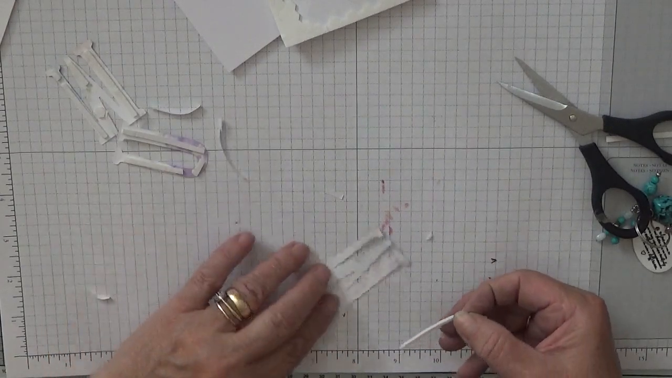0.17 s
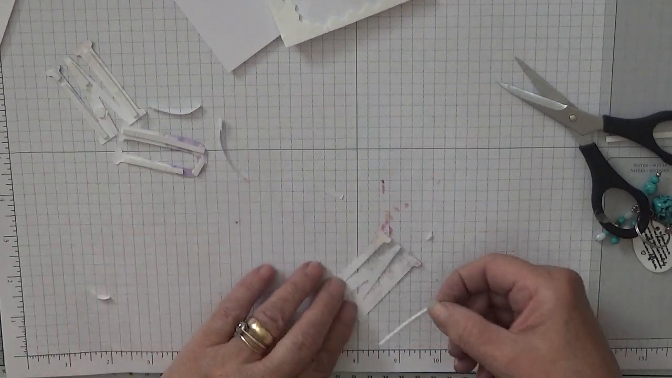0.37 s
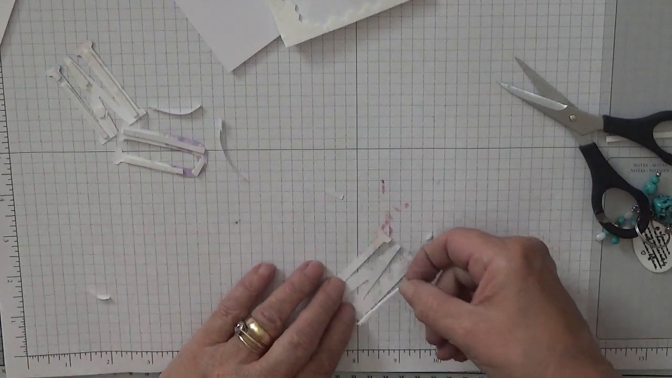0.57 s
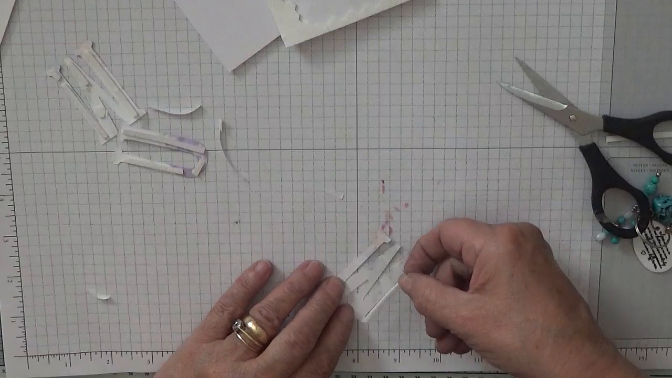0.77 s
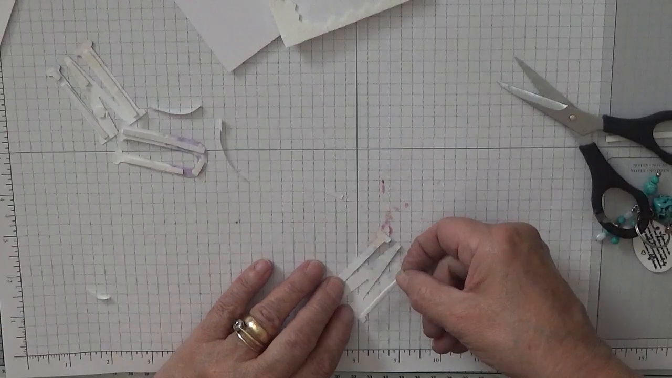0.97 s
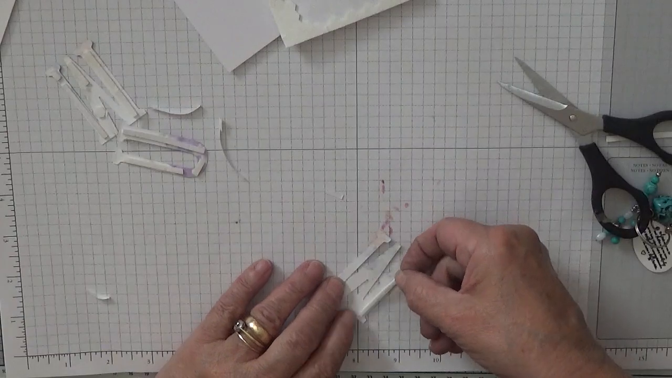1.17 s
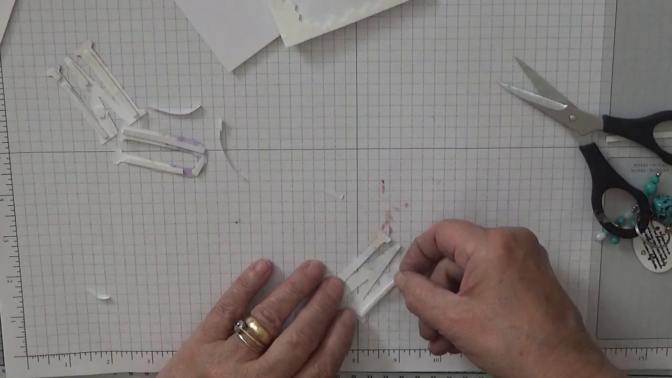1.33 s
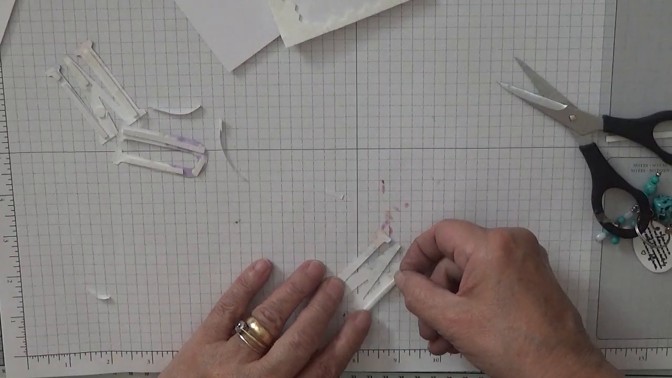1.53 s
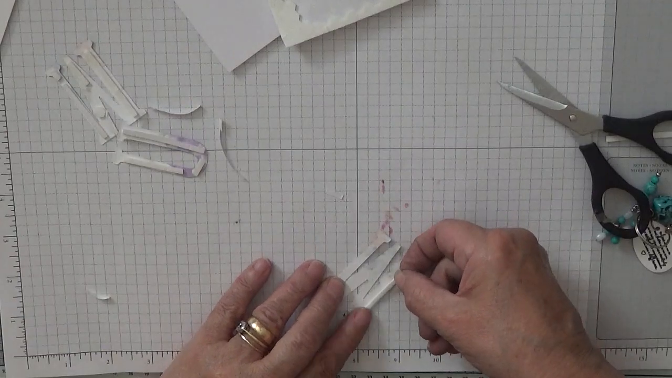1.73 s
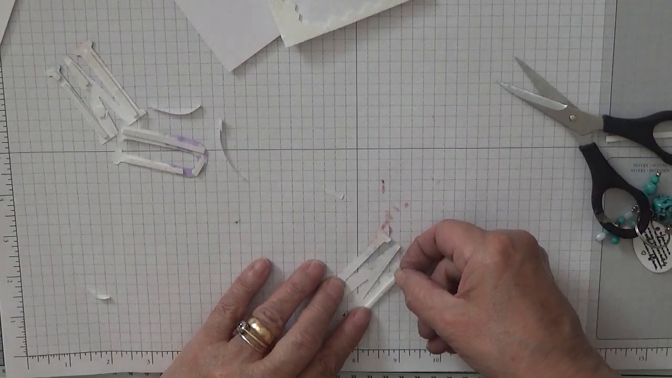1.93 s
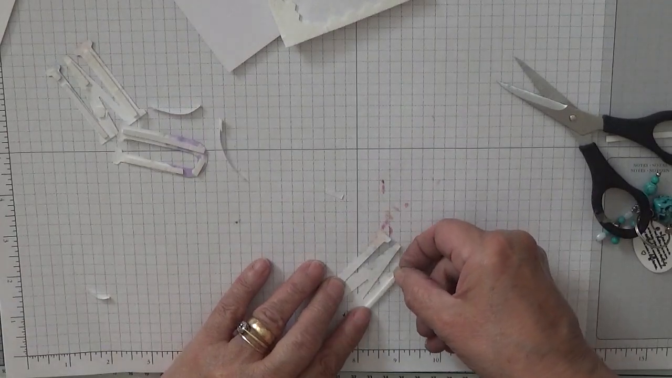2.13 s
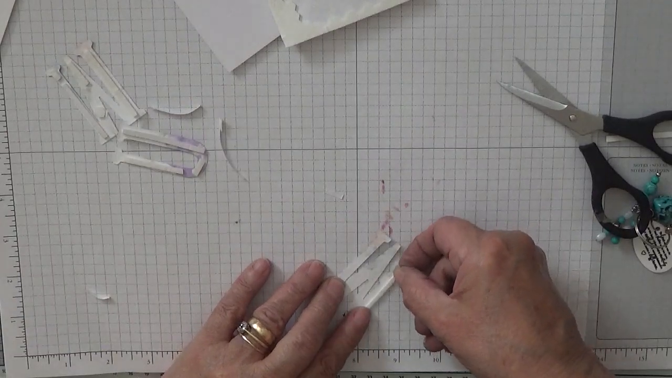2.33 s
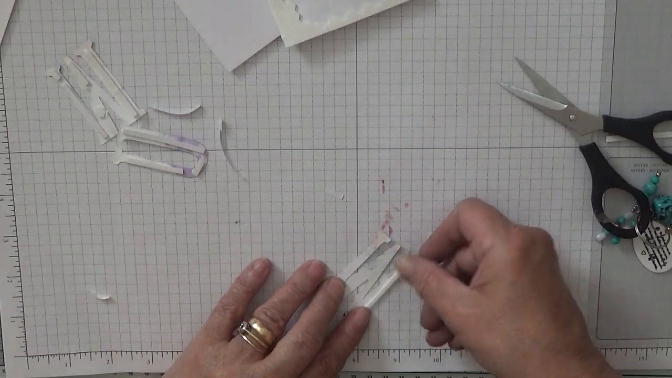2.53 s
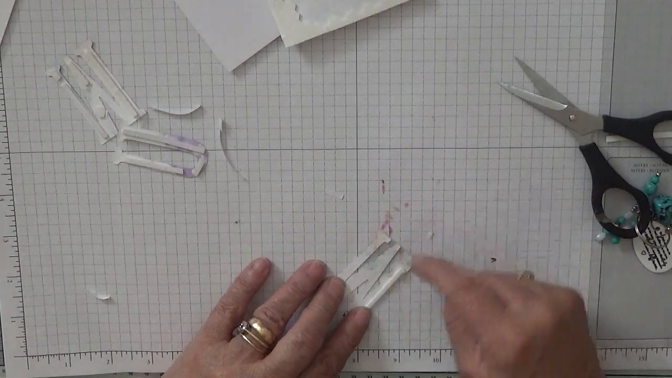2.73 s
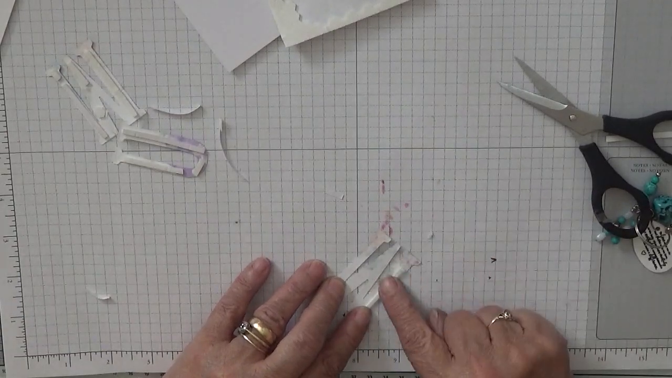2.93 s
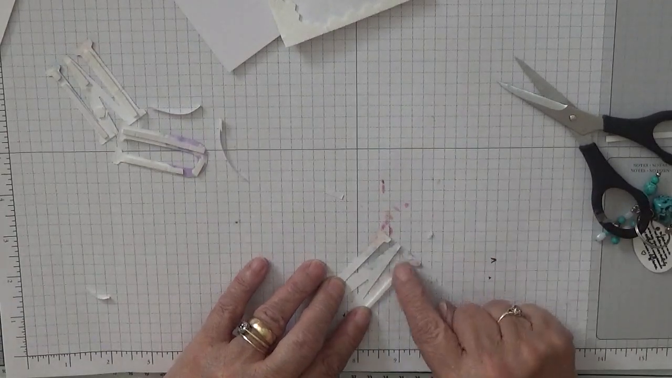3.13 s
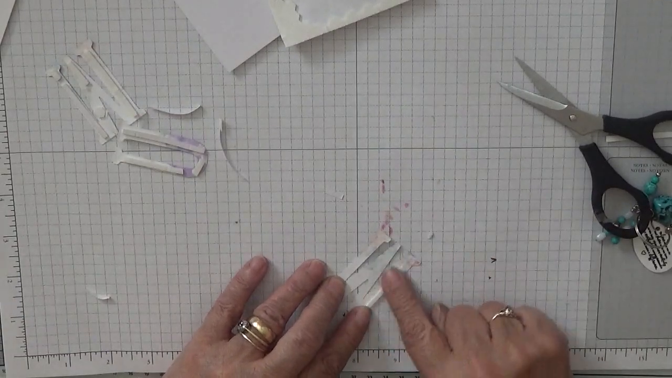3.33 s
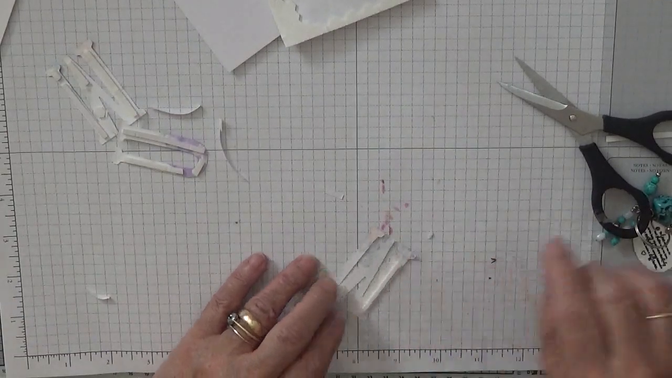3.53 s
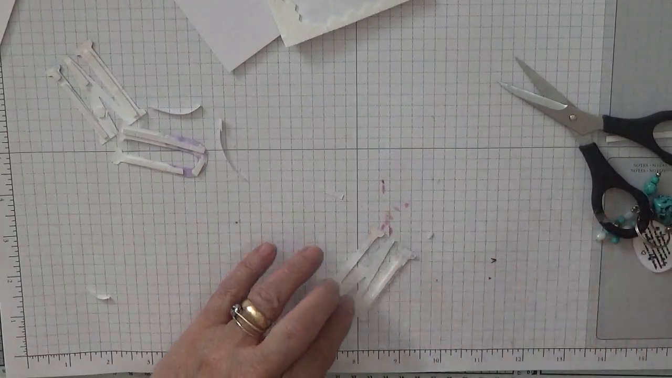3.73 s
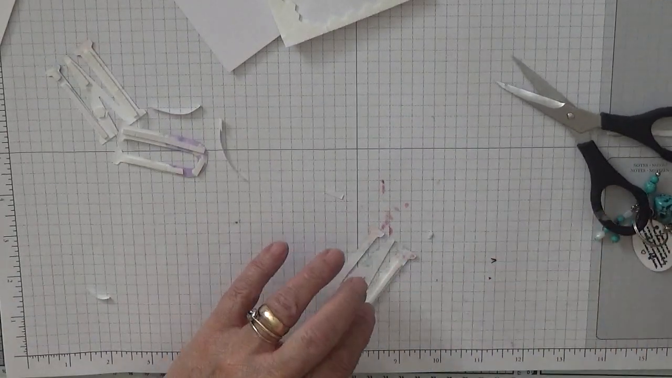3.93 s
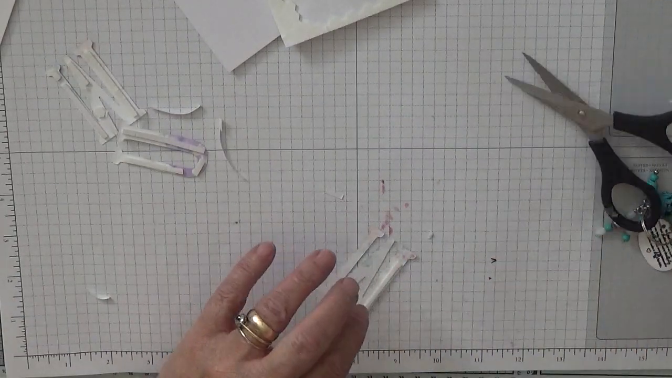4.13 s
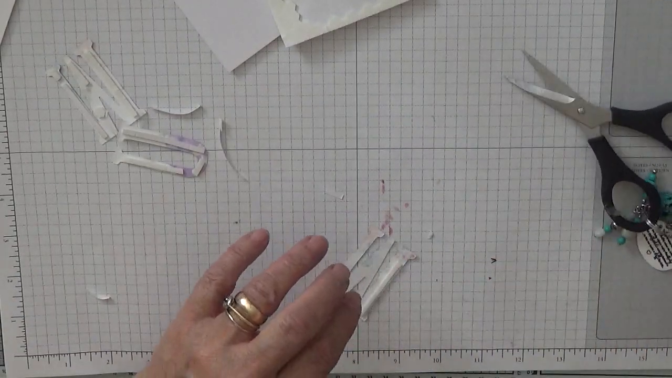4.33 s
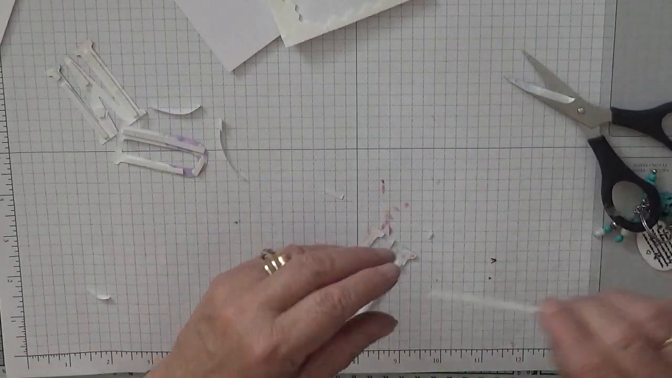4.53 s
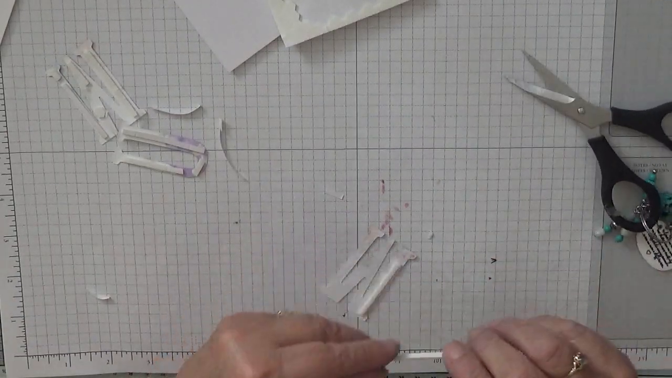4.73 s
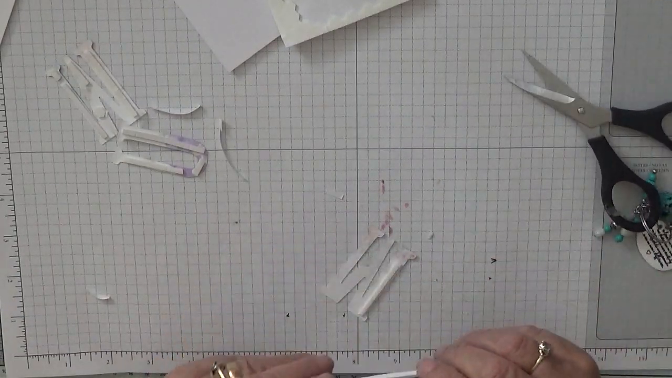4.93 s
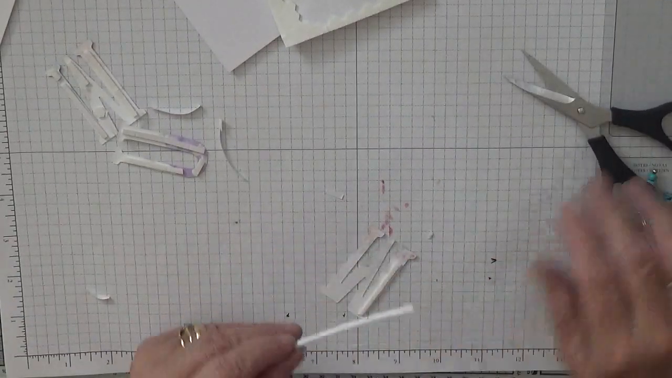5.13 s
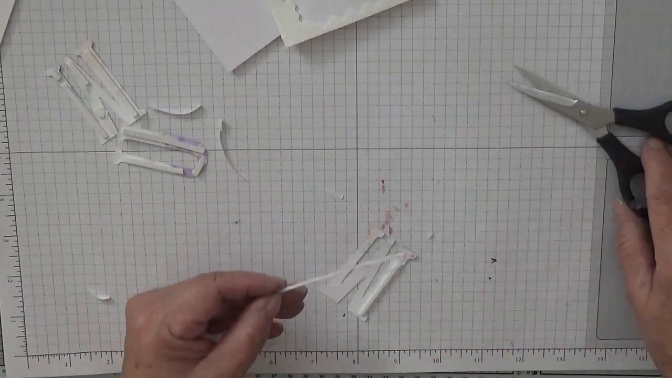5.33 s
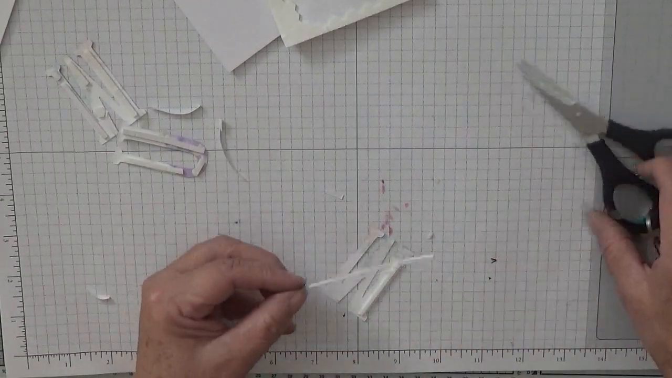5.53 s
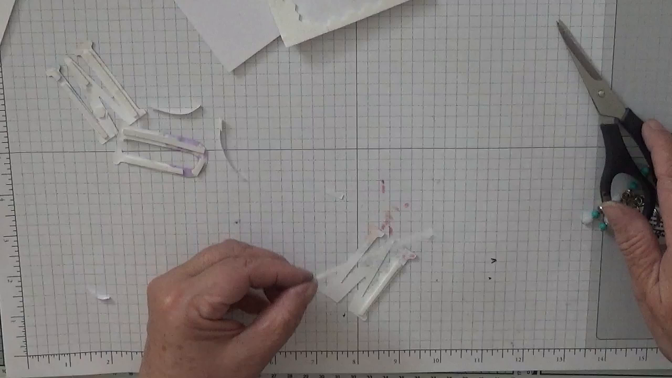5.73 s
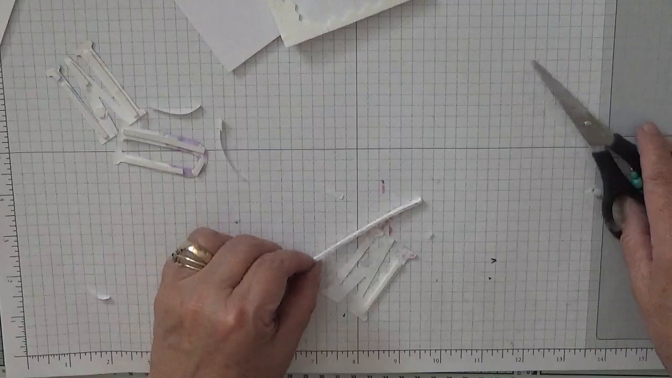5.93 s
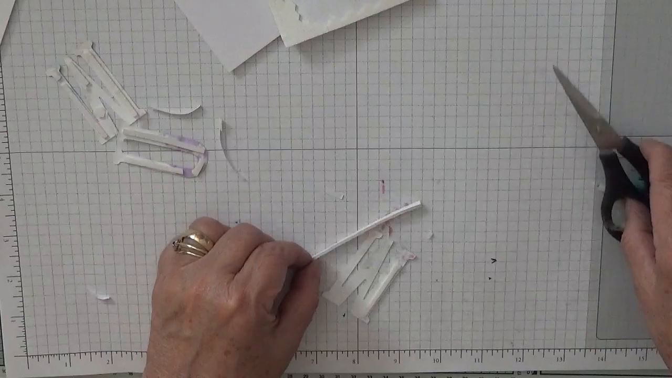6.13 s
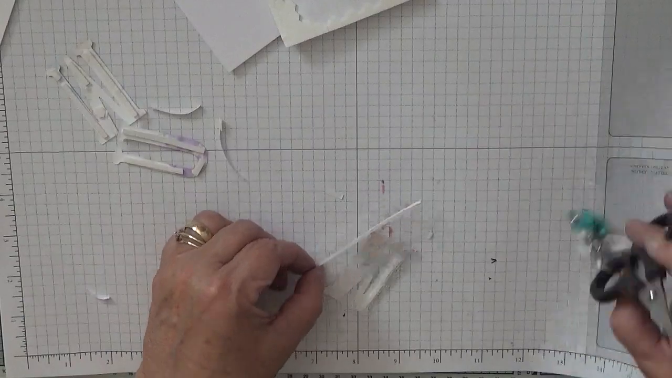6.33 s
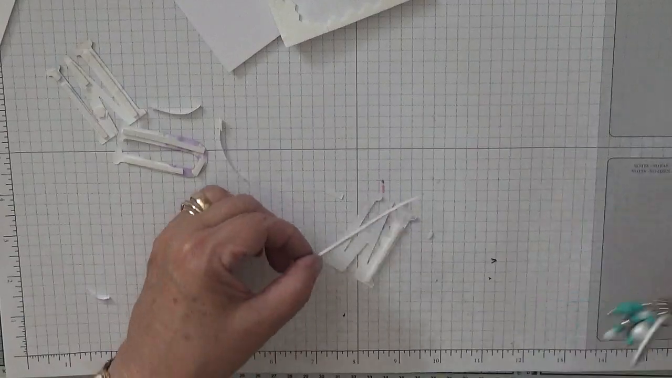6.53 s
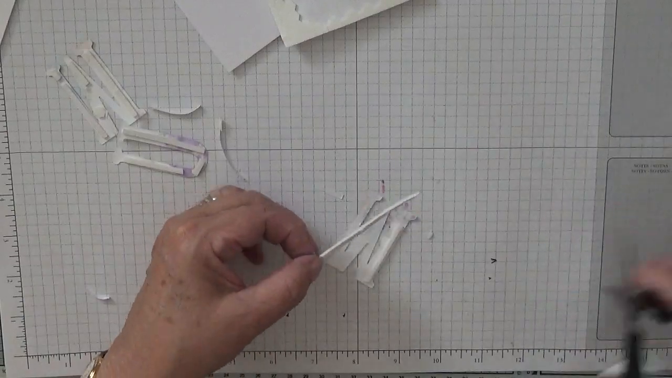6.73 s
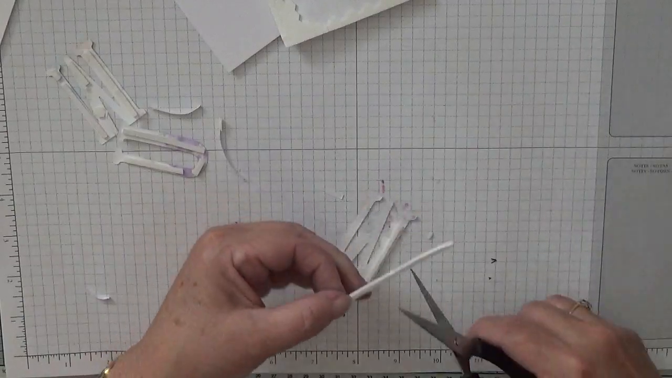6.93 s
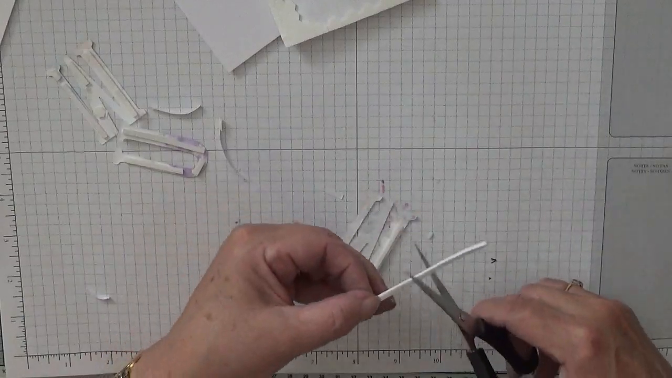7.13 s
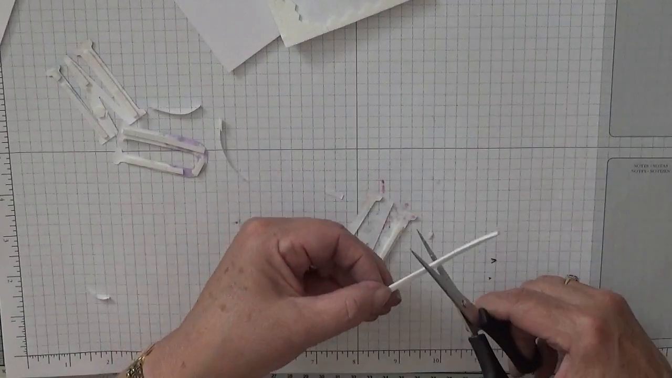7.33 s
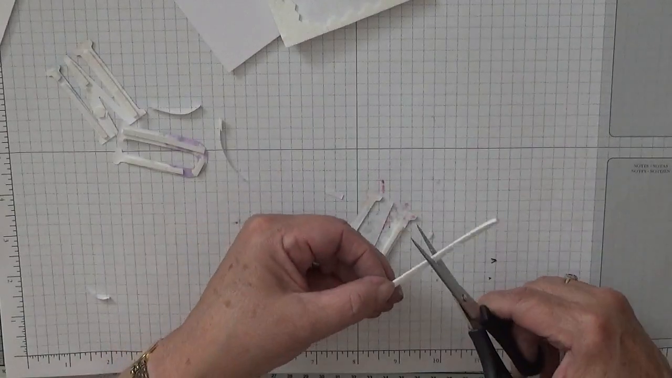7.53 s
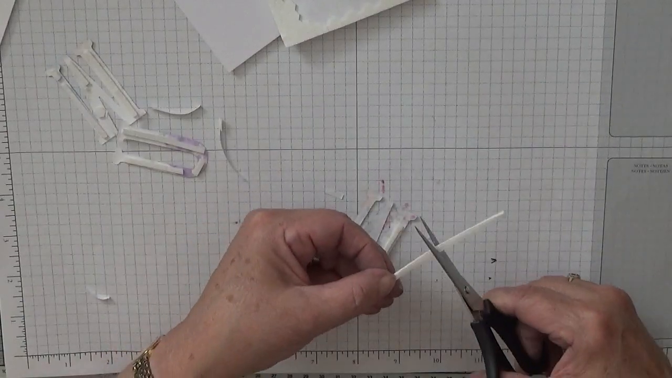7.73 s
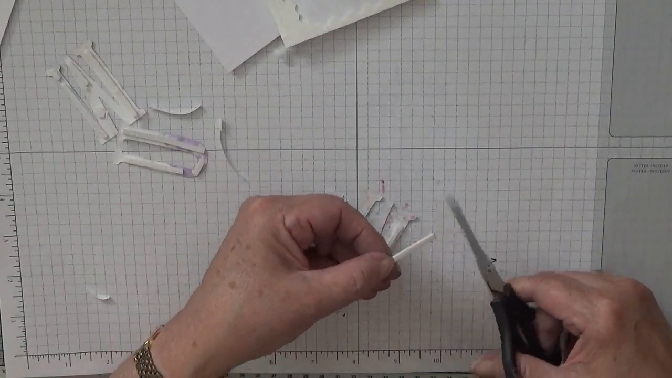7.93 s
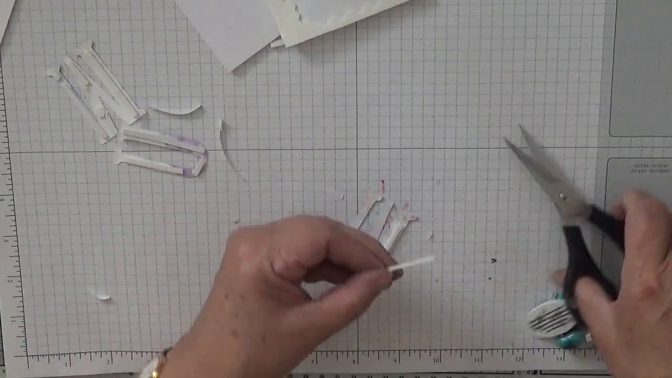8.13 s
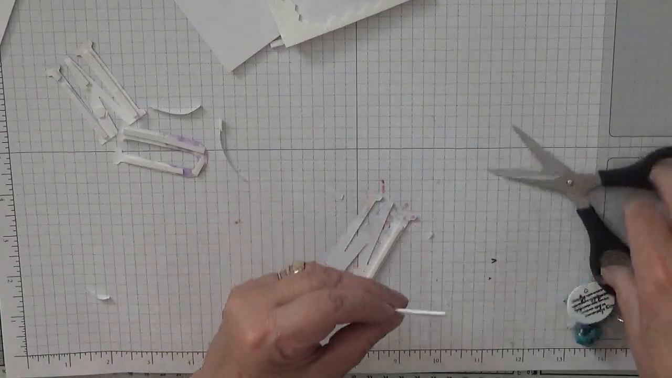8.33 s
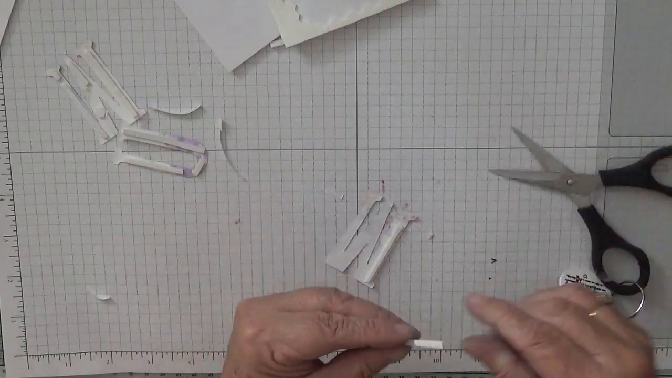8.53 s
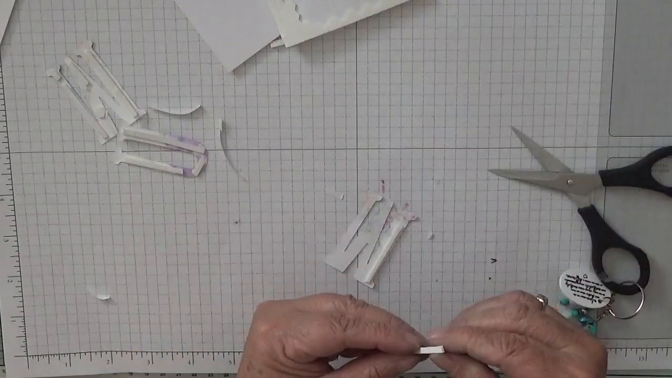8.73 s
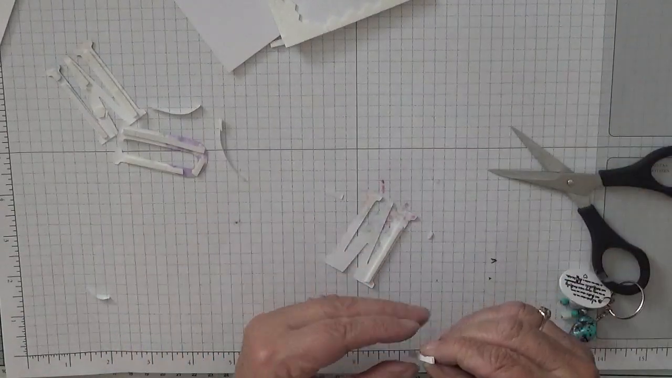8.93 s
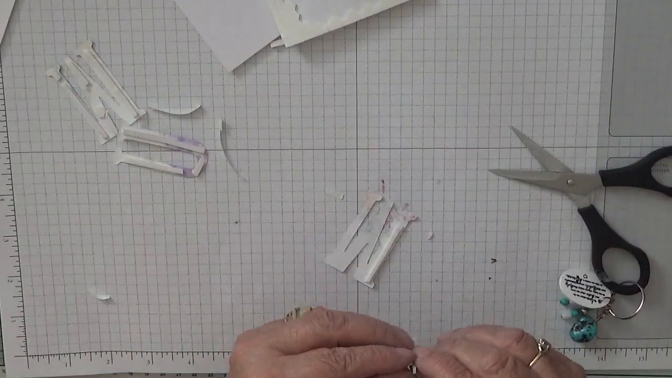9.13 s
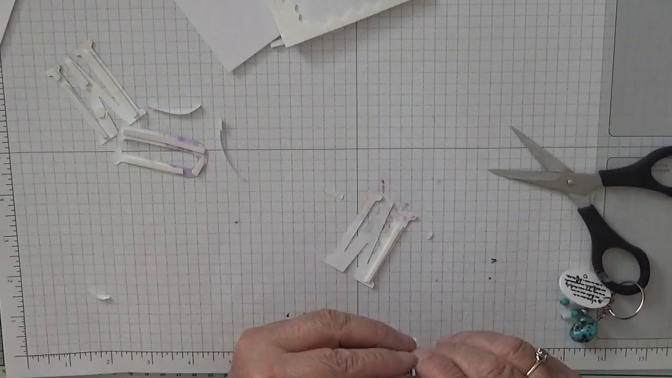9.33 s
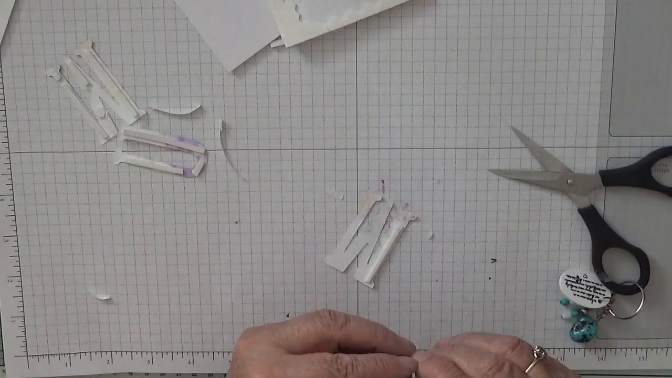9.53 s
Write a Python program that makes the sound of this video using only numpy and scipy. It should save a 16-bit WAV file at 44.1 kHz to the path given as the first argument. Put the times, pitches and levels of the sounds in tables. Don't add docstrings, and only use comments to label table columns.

```python
import sys
import numpy as np
from scipy import signal
from scipy.fft import rfft, irfft, next_fast_len
from scipy.io import wavfile
from scipy.ndimage import uniform_filter1d, map_coordinates

SR = 44100
rng = np.random.default_rng(int(sys.argv[2]) if len(sys.argv) > 2 else 0)


def wav_record(signal):
    frames = np.transpose(np.atleast_2d(signal))
    bounded = np.clip(frames, -1, 1)
    quanta = np.round(bounded * 32767).astype(np.int16)
    wavfile.write(sys.argv[1], SR, quanta)


def gain_from_decibels(decibels):
    exponent = np.asarray(decibels, float) / 20
    return 10 ** exponent


N = 426447

# start_s, ring_peak_db, bead_tick_rel_db, link_tick_rel_db
DISC_HITS = [(5.2632, -26.5, -9, -1), (5.513, -35.5, -17, -18), (5.7719, -32, -13, -11),
             (5.8522, -26, -14, -5.5), (5.8581, -20.5, -10.5, -12.5), (5.8913, -27.5, -9.5, -4.5),
             (5.928, -15.5, -7, -9), (5.9754, -26.5, 1, -14.5), (6.2666, -30, -15, 0), (6.279, -29, -8, -7),
             (6.2899, -32, -10, -6), (6.3572, -30, 0, -3), (6.4142, -25.5, -12.5, 3), (6.582, -36, -9, -11),
             (6.6854, -11, -11.5, -4), (6.916, -31, -10, -4), (6.7492, -24.5, -22, -5),
             (6.7992, -10.5, -11, -18.5), (6.8765, -21.5, -2.5, -7.5), (6.8876, -27, -13.5, -3),
             (6.9359, -9, -9.5, -3.5), (7.025, -10.5, -28, -12), (7.0857, -11, -12, -4),
             (7.213, -21, -8, -6), (7.2863, -20.5, -7.5, -1.5), (7.3464, -32.5, -2.5, -1.5),
             (8.1215, -19, -16.5, -12.5), (8.201, -22.5, -4, -5.5), (8.3046, -15.5, -15, -7),
             (8.4099, -24, -17, -15)]
# start_s, tick_peak_db, pitch_hz, disc_ring_rel_db
BEAD_HITS = [(4.2892, -30, 5070, -16), (5.2583, -29, 4380, -12.5), (5.278, -26, 5800, -20),
             (5.7795, -34.5, 5200, -21.5), (5.8255, -33, 6060, -14.5), (5.846, -31.5, 4600, 1),
             (5.9108, -28, 5500, -11.5), (5.9697, -24, 4970, -15.5), (6.227, -22, 4080, -30),
             (6.437, -26, 3767, -20), (6.4425, -22.5, 4090, -32.5), (6.4462, -24, 4380, -24),
             (6.543, -44, 5660, -27), (7.2161, -27.5, 5800, -7.5), (7.3553, -40.5, 3750, -3.5),
             (7.4279, -38, 5600, -11.5), (7.727, -39.5, 5430, -9), (7.96, -40.5, 5040, -20.5),
             (8.053, -42.5, 3300, -9), (8.0842, -35.5, 5600, -8), (8.134, -19, 5600, 0),
             (8.1674, -20, 5730, -4), (8.2205, -28.5, 5300, 0), (8.259, -25, 6214, -3.5),
             (8.2666, -6, 6240, -7), (8.2759, -19.5, 6300, -7.5), (8.3241, -28.5, 5630, -1.5),
             (8.3392, -23.5, 6250, -1.5), (8.3561, -24, 6710, -4)]
# start_s, thin_tick_peak_db, bead_tick_rel_db, disc_ring_rel_db
LINK_HITS = [(4.2418, -24.5, 2, -20.5), (4.2558, -16.5, -5.5, -21.5), (4.3007, -37, -16, -12),
             (4.3314, -38.5, -3.5, -22), (4.419, -33.5, -7, -18), (5.4628, -28.5, -6, -10.5),
             (5.723, -52, 5.5, 5.5), (5.7611, -22, -12, -11), (5.959, -40, -1.5, 6),
             (6.2147, -30.5, -4, -9), (6.3356, -24, -9, -14), (6.373, -24.5, -20.5, -23),
             (6.385, -17, -5, -5), (6.4534, -11.5, -3, -7), (6.6014, -35.5, -9, -8.5),
             (6.6456, -28.5, -6, -7), (6.7246, -18, -4, -4), (6.7459, -13, -4, -4), (7.106, -45, 10, -7),
             (7.2308, -27.5, -14, -26), (7.244, -28.5, -15.5, -6), (7.405, -31.5, -6, -25),
             (7.8005, -35, -8, -17), (7.8258, -34.5, -5, -3), (7.8819, -22, -4, -30),
             (8.2347, -38, -4.5, -11), (8.3822, -17.5, -2, -12)]
# start_s, bead_tick_db, thin_tick_db, disc_ring_db
LIGHT_HITS = [(4.0138, -41, -47, -60), (4.1126, -48, -55, -46), (4.2518, -44.5, -36.5, -47),
              (4.3165, -56.5, -53.5, -48), (5.26, -33.5, -37, -49.5), (5.7455, -48, -57, -54),
              (5.8167, -44, -60, -62), (5.8753, -39, -38.5, -35), (5.9059, -42, -37, -42),
              (6.1615, -41, -52.5, -54), (6.1811, -44.5, -53, -49.5), (6.2311, -35.5, -37, -42),
              (6.3168, -34, -35, -42), (6.3608, -30.5, -28, -29), (6.3637, -31.5, -29, -32),
              (6.3731, -26.5, -21, -31), (6.4491, -22, -37, -45), (6.5423, -37, -37, -50),
              (6.6346, -52, -47, -49), (6.6495, -40, -46, -39.5), (6.6729, -44.5, -38.5, -50),
              (6.7522, -31, -25, -20), (6.7553, -33, -22.5, -21), (6.8092, -39, -34, -29),
              (6.8216, -39, -36, -42.5), (6.8718, -49, -38.5, -47.5), (6.8873, -33.5, -33.5, -30),
              (6.9171, -34.5, -32.5, -38.5), (6.9219, -48.5, -47, -35), (7.105, -28, -44, -39),
              (7.2395, -45.5, -41, -36.5), (7.2961, -47, -33, -32), (7.8779, -42, -44, -51.5),
              (7.9598, -36.5, -37, -58), (8.0533, -42, -43.5, -52), (8.0795, -55.5, -42, -69),
              (8.1296, -19.5, -30.5, -21.5), (8.2148, -35.5, -47, -38), (8.2346, -32.5, -34, -38),
              (8.2395, -37.5, -39.5, -37.5), (8.2523, -43, -36, -44.5), (8.2624, -25, -28.5, -31.5),
              (8.2709, -18, -19.5, -24.5), (8.3014, -22.5, -38.5, -26.5), (8.3074, -29.5, -34, -23),
              (8.3237, -29, -35, -32.5), (8.3395, -31, -34.5, -27), (8.3506, -33, -45, -46),
              (8.3918, -34.5, -35, -32.5), (8.6049, -61.5, -50, -59)]
# pitch_hz, level_db, t60_s
DISC_MODES = [(7775, 2.5, 0.0225), (8010, -16, 0.048), (7480, -16, 0.048)]
# start_s, peak_db, pitch_hz
GLANCES = [(6.2665, -23, 7760), (6.2775, -23, 7800), (6.2915, -21, 7800), (6.3565, -28, 7720),
           (6.3865, -19, 7750), (6.4155, -32, 7800), (6.695, -26, 7800), (6.7, -26, 7800),
           (6.7315, -26, 7900), (6.7365, -27, 8000), (6.76, -28, 7500), (6.851, -42, 8900),
           (7.198, -48, 7800), (6.917, -47, 3100), (7.232, -50, 3100), (7.332, -49, 3100),
           (4.51, -54, 7800), (7.809, -42, 8000), (8.113, -34, 7700), (8.1365, -20, 7700),
           (8.14, -20, 7800), (8.171, -25, 7800), (8.2225, -34, 8000), (8.286, -29, 7700),
           (8.287, -31, 6100)]
# start_s, peak_db, pitch_hz
PINGS = [(2.3826, -44, 4200), (2.4469, -44, 4800), (2.5387, -42, 2400), (2.5387, -43, 4400),
         (6.2143, -36, 7900), (6.227, -23, 4000), (6.232, -38, 10000), (6.6854, -24, 9000),
         (6.6854, -30, 4200), (6.7246, -22, 9000), (6.7246, -25, 4700), (6.7459, -19, 10300),
         (6.7459, -26, 5800), (6.7992, -25, 3700), (6.8095, -36, 9700), (7.015, -46, 9500),
         (7.025, -24, 9400), (7.025, -30, 4100), (7.0857, -22, 4600), (7.0857, -27, 6300),
         (7.0857, -22, 9500), (7.268, -42, 9500), (7.79, -46, 4000), (7.796, -41, 9800),
         (7.8258, -42, 9800), (7.9137, -46, 4900), (8.2665, -17, 6740), (8.2665, -20, 8450),
         (8.2695, -16, 6100), (8.271, -27, 9800), (8.2765, -24, 7000), (8.3395, -22, 6400),
         (8.357, -22, 6300), (8.3825, -22, 6000), (8.257, -36, 2000), (6.385, -33, 1100),
         (6.5415, -36, 1800), (5.297, -42, 5500), (5.317, -44, 8500), (5.335, -43, 6500),
         (5.399, -48, 7000), (4.13, -46, 8000), (3.81, -48, 7000), (.345, -54, 420), (1.862, -56, 600),
         (9.101, -54, 900)]
# start_s, peak_db
KEY_RING_TAPS = [(6.7247, -41), (6.746, -41), (6.7992, -42), (6.8771, -42), (6.9364, -44), (7.2868, -47),
                 (7.8249, -51), (8.052, -56.5), (8.135, -40.5), (8.166, -38.5), (8.221, -47),
                 (8.3025, -44.5)]
# pitch_hz, level_db, t60_s
BLADE_MODES = [(5770, 3, 0.03), (6300, 8, 0.03)]
# start_s, peak_db, pitch_hz
KNOCKS = [(0.178, -43.5, 2500), (0.2004, -37, 2600), (0.343, -50.5, 1000), (0.424, -42, 2900),
          (1.862, -53.5, 1500), (2.5358, -39.5, 2400), (3.8235, -41, 1480), (4.2421, -31.5, 1890),
          (4.255, -26, 1310), (4.3256, -41, 1550), (5.26, -32.5, 1510), (5.2779, -28.5, 1790),
          (5.7454, -42, 1800), (5.8168, -42.5, 1800), (5.823, -40.5, 1710), (5.8567, -31, 1290),
          (5.925, -31.5, 1690), (6.4446, -25.5, 2260), (6.5403, -34, 1730), (6.6842, -35.5, 1790),
          (6.724, -31.5, 2430), (6.799, -38, 2515), (6.8764, -33, 1770), (6.9348, -40, 2280),
          (7.8781, -28.5, 1900), (7.8815, -20, 1980), (7.9137, -39.5, 1800), (7.9591, -32, 1700),
          (8.2005, -36.5, 1410), (8.2696, -25, 1470), (9.101, -44, 2300)]
# start_s, tick_peak_db, pitch_hz, disc_ring_rel_db, thin_tick_rel_db
PAPER_TICKS = [
    (2.3826, -32.5, 3940, -3.5, -4.5),
    (2.4469, -28, 5100, 4, 7),
    (2.5387, -28, 4670, -3, -0.5),
    (2.7233, -33.5, 4480, -4, -6),
    (3.3988, -42.5, 5600, 14, 7),
    (3.8228, -33.5, 5060, -14, -18.5),
    (3.9136, -42.5, 6900, 25, 0.5),
]
# strongest_s, scuff_db, scrape_db,
# fade_20_db_s
FINGER_STROKES = [(0, -56, -55.5, 0.1251), (.345, -57, -64, 0.1), (.375, -58.5, -70, 0.04),
                  (.5, -63.5, -63, 0.4), (2.42, -72.5, -79, 2.94), (2.56, -65, -71.5, .5),
                  (2.87, -66, -80.5, 0.2), (3.1, -60.5, -69.5, 0.0874), (3.23, -59.5, -72.5, 0.0146),
                  (3.37, -57, -63, 0.18), (3.57, -69.5, -70, 0.48), (3.92, -59, -62, 0.02),
                  (4.0, -62, -61.5, 0.21), (4.1, -59, -57.5, 0.2151), (4.6, -74, -68, 0.01),
                  (4.84, -62, -87.5, 0.16), (5.03, -66.5, -92, 0.22), (5.585, -48.5, -53, 0.13),
                  (6.32, -40.5, -46, .24), (6.385, -40.5, -47, 0.13), (8.6, -69, -85, 0.13),
                  (8.76, -69.5, -84.5, 0.4), (8.9, -66, -83, 0.19)]
# strongest_s, scuff_db, scrape_db, fade_20_db_s
HANDLE_STROKES = [(.16, -53, -58, 0.26), (3.83, -61.5, -57.5, 0.33), (4.26, -60, -44, 0.0876),
                  (4.43, -64, -67, 0.135), (5.265, -53, -47, 0.16), (5.44, -55.5, -55.5, 0.267),
                  (5.553, -52.5, -57.5, .36), (5.77, -71.5, -49.5, 0.083), (5.86, -48, -47, 0.34),
                  (5.97, -57, -47, 0.15), (6.262, -45, -50, 0.25), (6.45, -43.5, -50.5, 0.048),
                  (6.56, -63, -69, 0.74), (6.69, -43, -60.5, 0.366), (6.76, -41.5, -73, 0.13),
                  (6.93, -55.5, -63.5, 0.048), (7.03, -52, -54, 0.073), (7.1, -59.5, -57, 0.153),
                  (7.23, -49.5, -57, 0.069), (7.33, -55, -58, 0.11), (7.4, -67.5, -78, 0.93),
                  (7.795, -52, -60.5, 0.09), (7.895, -70, -50.5, 0.085), (8.085, -56.5, -60.5, 0.31),
                  (8.12, -42, -50, 0.228), (8.28, -43.5, -46, 0.2), (8.42, -52, -53, 0.08),
                  (8.455, -54, -57, 0.026)]
# start_s, stop_s, swinging_free_0_to_1
CHARM_MOVES = [
    (4.24, 4.348, 0.99),
    (5.665, 5.743, 0.04),
    (5.75, 6.031, 0.6),
    (6.25, 6.458, 0),
    (6.457, 7.44, 0.9),
    (8.112, 8.463, 1),
]
# pitch_hz, level_db_per_hz
SCUFF_SPECTRUM = [(1200, -30), (2500, -4.5), (6500, -4.5), (9300, -0.5), (11000, -11)]
# pitch_hz, level_db_per_hz
RATTLE_SPECTRUM = [(1500, -21), (4000, -8), (6500, -4), (9300, -1.5), (11000, -9.5)]
# pitch_hz, level_db_per_hz
SCRAPE_SPECTRUM = [(300, -12.5), (900, -7), (1500, -3), (2300, -3.5), (3200, -13)]
# time_s, level_db
SLEEVE_SQUEAK = [(3.46, -92), (3.5, -74), (3.79, -68.5), (3.83, -90.5)]
# time_s, level_db
HANDLE_DRAG = [(5.54, -87), (5.56, -49), (5.6, -46.5), (5.7, -83.5)]
# start_s, peak_db, hollow_rel_peak_db
THUDS = [(0.002, -55, -24.5), (3.823, -40.5, -19), (4.253, -40.5, -5.5), (4.6, -57, -6),
         (5.277, -42.5, -5.5), (5.638, -60, 3.5), (5.852, -43, 0.5), (5.929, -55.5, 11),
         (5.954, -49, -24.5), (6.229, -64, 13.5), (8.204, -47.5, -15.5), (8.263, -50.5, 2),
         (9.096, -57, -7)]
# pitch_hz, level_db, t60_s
TABLE_MODES = [(109.2, -1.5, 0.23), (146.56, -2.5, 0.21), (205.83, -7.5, 0.26), (337.3, -6.5, 0.081)]
# pitch_hz, level_db, t60_s
HOLLOW_MODES = [(644.1, -5, 0.16), (471.5, -14, 0.124)]
# time_s, left_minus_right_db
SIDEWAYS = [(0, 0), (4.2, 2), (4.6, -0.5), (5.3, 2.5), (8.6, 1.3)]
# pitch_hz, t60_s
ROOM_DECAY = [(300, 0.2), (2000, 0.2), (8000, 0.136), (11000, 0.12)]
# pitch_hz, level_db_per_hz
HISS_SPECTRUM = [(20, -14), (155, -7), (1910, -14), (2400, -14.5), (3820, -17.5), (7250, -21), (10400, -24)]
# pitch_hz, likeness_0_to_1
HISS_LIKENESS = [(60, 0.952), (130, 0.84), (270, 0.524), (700, 0.073), (2500, 0), (11000, 0.86)]
# time_s, level_db
ROOM_DRIFT = [(1.5, -0.5), (6, 4.5), (9.67, 3.5)]


def charm():
    def bead_pitches(rows, middle_hz):
        return middle_hz * np.exp(0.08 * rng.standard_normal(len(rows)))

    # start_s, tick_peak_db, pitch_hz, disc_ring_rel_db, thin_tick_rel_db
    rows = [(s, db, hz, disc, -13.5) for s, db, hz, disc in BEAD_HITS]
    for (s, db, tick, link), hz in zip(DISC_HITS, bead_pitches(DISC_HITS, 4690)):
        rows.append((s, db + tick, hz, -tick, link - tick))
    for (s, db, tick, disc), hz in zip(LINK_HITS, bead_pitches(LINK_HITS, 5600)):
        rows.append((s, db + tick, hz, disc - tick, -tick))
    return ticks(rows, ring_db=0.5, width=0.58, t60=0.0132)


def ticks(rows, ring_db, width, t60):
    s, db, hz, disc, thin = np.transpose(rows)
    low = cracks(s, db + 0.11, hz, width, t60, rise=0.00029)
    high = cracks(s, db + thin + 0.112, 8984, 0.2087, t60, rise=0.0001)
    ring = strikes(s, db + disc + ring_db, DISC_MODES, 0.003, 2, rise=0.0007, size=2048)
    return low + high + ring


def light_contacts():
    s, bead_db, thin_db, disc_db = np.transpose(LIGHT_HITS)
    low = cracks(s, bead_db + 2, np.full(len(s), 5000), 0.71, 0.005, rise=0.00018)
    high = cracks(s, thin_db + 3, 9400, 0.3, 0.006, rise=0.00015)
    ring = strikes(s, disc_db + 0.1, DISC_MODES, 0.004, 2.5, rise=0.0007, size=2048)
    return low + high + ring


def steel():
    with_disc = np.array(DISC_HITS)[:, :2] + [0, -33]
    s, db = np.vstack([with_disc, KEY_RING_TAPS]).T
    key_ring = strikes(s, db, [(3100, 0, 0.04)], 0.0048, 0, rise=0.00089, size=4096)
    blades = strikes([8.2662], [-12.5], BLADE_MODES, 0, 0, rise=0.000517, size=4096)
    return key_ring + blades


def notes(rows, t60, rise):
    out, t = np.zeros(N + 1024), np.arange(1024) / SR
    shape = gain_from_decibels(-60 * t / t60) * (1 - np.exp(-t / rise))
    shape = shape / shape.max()
    for s, db, hz in rows:
        out[round(s * SR):][:len(t)] += gain_from_decibels(db) * shape * np.sin(2 * np.pi * hz * t)
    return out[:N]


def knocks():
    s, db, hz = np.transpose(KNOCKS)
    return cracks(s, db + 0.1074, hz, 0.82, 0.018, rise=0.00043)


def rubbing():
    fingers_db = strokes(FINGER_STROKES, rise_s=0.1155, rounding=1.292)
    handles_db = strokes(HANDLE_STROKES, rise_s=0.0356, rounding=0.989)
    scuff_gain, scrape_gain = gain_from_decibels(np.maximum(fingers_db, handles_db))

    t = np.arange(N) / SR
    moving, free = np.zeros((2, N))
    for start, stop, swing in CHARM_MOVES:
        inside = (t > start) & (t < stop)
        moving += inside
        free += inside * swing

    grain = gain_from_decibels(2.3 * wobble(500) + 0.8 * wobble(50))
    scuff = unit(grain * patchy(rush(SCUFF_SPECTRUM, [(2000, 0.9), (9000, 0.95)]), depth_db=2))
    rattle = unit(gain_from_decibels(3 * wobble(600) + 1.2 * wobble(120)) * rush(RATTLE_SPECTRUM, [(5000, 0.95)]))
    disc_and_ring = band_noise(7790, 90) + gain_from_decibels(-15) * band_noise(3119.6, 35)
    singing = gain_from_decibels(3.2 * wobble(110) - 8.5) * disc_and_ring
    scrape = unit(gain_from_decibels(3 * wobble(150)) * rush(SCRAPE_SPECTRUM, [(1000, 0.8)]))
    squeak = gain_from_decibels(curves(SLEEVE_SQUEAK)[0]) * band_noise(1401.5, 40)
    drag = gain_from_decibels(curves(HANDLE_DRAG)[0]) * band_noise(1800, 350)

    bright = (1 - free) * scuff + free * gain_from_decibels(0.5) * rattle + moving * singing
    return gain_from_decibels(4.5) * scuff_gain * bright + scrape_gain * scrape + squeak + drag


def strokes(rows, rise_s, rounding):
    t, level_db = np.arange(N) / SR, np.full((2, N), -200.)
    for s, scuff_db, scrape_db, fade_s in rows:
        shape_db = -20 * np.maximum((s - t) / rise_s, (t - s) / fade_s) ** rounding
        level_db = np.maximum(level_db, shape_db + [[scuff_db], [scrape_db]])
    return level_db


def thuds():
    s, db, hollow = np.transpose(THUDS)
    top = strikes(s, db + 0.0873, TABLE_MODES, 0.0292, 2.75, rise=0.004, size=SR // 3)
    below = strikes(s, db + hollow, HOLLOW_MODES, 0.0083, 4.1, rise=0.0023, size=SR // 4)
    return top + below


def room(x):
    hz, t, z = signal.stft(rng.standard_normal((3, 2, SR // 4)), SR, nperseg=256)
    decay = gain_from_decibels(-60 * t / along(ROOM_DECAY, hz)[:, None])
    mid, side = signal.istft(z * decay, SR, nperseg=256)[1].transpose(1, 0, 2)
    tails = np.array([mid + 0.309 * side, mid - 1.063 * side])
    tails = tails / np.linalg.norm(mid, axis=1, keepdims=True)
    place = np.arange(N) // 1500 % 3 == np.arange(3)[:, None]
    late = np.pad(x * place, ((0, 0), (200, 0)))
    return signal.oaconvolve(late[None], tails, axes=2).sum(1)[:, :N]


def mains():
    t = np.arange(N) / SR
    phase = 2 * np.pi * np.cumsum(49.5 + 0.24 * wobble(0.53)) / SR
    second = gain_from_decibels(-79 + 3 * wobble(8)) * np.sin(2 * phase)
    third = gain_from_decibels(-76 + 3 * wobble(8)) * np.sin(3 * phase)
    beat = np.sin(phase) + 0.81 * np.sin(phase + 2 * np.pi * (t - 0.722) / 1.332)
    level_db = -70 + 3.5 * np.cos(2 * np.pi * (t - 0.8) / 3.412)
    return gain_from_decibels(level_db) * beat + second + third + gain_from_decibels(-82) * band_noise(28, 6.036)


def room_tone():
    hiss = gain_from_decibels(-64) * rush(HISS_SPECTRUM, HISS_LIKENESS)
    low = filtered(hiss, lambda hz: 1 / (1 + (hz / 900) ** 2))
    return hiss + (gain_from_decibels(curves(ROOM_DRIFT)[0]) - 1) * low


def camera():
    picture = SR // 25
    t = np.arange(1024) / SR
    falling = np.sin(2 * np.pi * np.cumsum(2390 + 900 * np.exp(-t / 0.002)) / SR)
    falling = falling * gain_from_decibels(-60 * t / 0.076) * (1 - np.exp(-t / 0.000818))
    steady = np.sin(2 * np.pi * 3300 * t) * gain_from_decibels(-60 * t / 0.023) * (1 - np.exp(-t / 0.00089))
    chirp = falling + 1.3 * steady
    beats = np.zeros(N)
    starts = np.arange(picture - 190, N, picture)
    beats[starts] = gain_from_decibels(-62.5 + 1.3 * rng.standard_normal(len(starts)))
    gate = 1 + 0.32 * np.cos(2 * np.pi * (np.arange(N) / picture - 0.25))
    whine = gate * np.sin(2 * np.pi * 7812.5 * np.arange(N) / SR)
    return signal.fftconvolve(beats, chirp)[:N] + gain_from_decibels(-81.5) * whine


def cracks(times, peaks_db, centres_hz, width, t60, rise):
    out, t = np.zeros(N + 1024), np.arange(1024) / SR
    shape = gain_from_decibels(-60 * t / t60) * (1 - np.exp(-t / rise))
    bursts = rng.standard_normal((len(times), len(t))) * shape
    bursts[:, 0] = 8
    f, c = np.fft.rfftfreq(2048, 1 / SR), np.reshape(centres_hz, (-1, 1))
    damping = 1j * f * width * c
    resonance = damping / (c * c - f * f + damping)
    bursts = irfft(rfft(bursts, 2048) * resonance ** 2)[:, :len(t)]
    for s, peak_db, burst in zip(times, peaks_db, bursts):
        out[round(s * SR):][:len(t)] += gain_from_decibels(peak_db) * burst / np.abs(burst).max()
    return out[:N]


def strikes(times, peaks_db, modes, detune, scatter_db, rise, size):
    out, t = np.zeros(N + size), np.arange(size) / SR
    hz, db, t60 = np.transpose(modes)[..., None]
    luck = rng.standard_normal((len(times), 2, len(modes), 1))
    for s, peak_db, (shift, weight) in zip(times, peaks_db, luck):
        decay = gain_from_decibels(db + scatter_db * weight - 60 * t / t60)
        ring = decay * np.sin(2 * np.pi * hz * (1 + detune * shift) * t)
        ring = ring.sum(0) * (1 - np.exp(-t / rise))
        out[round(s * SR):][:size] += gain_from_decibels(peak_db) * ring / np.abs(ring).max()
    return out[:N]


def rush(spectrum, alike):
    def shape(hz):
        turn = np.arccos(np.clip(along(alike, hz), -1, 1)) / 2
        return gain_from_decibels(along(spectrum, hz)) * [np.cos(turn), np.sin(turn)]

    mid, side = filtered(rng.standard_normal((2, N)), shape)
    return unit(np.array([mid + side, mid - side]))


def patchy(x, depth_db):
    z = signal.stft(x, nperseg=256)[2]
    field = uniform_filter1d(rng.standard_normal(z.shape[1:]), size=7, axis=0)
    field = uniform_filter1d(field, size=16, axis=1)
    return signal.istft(z * gain_from_decibels(depth_db * unit(field)), nperseg=256)[1][:, :N]


def band_noise(centre_hz, width_hz):
    return unit(filtered(rng.standard_normal(N), lambda hz: 1 / (1 + ((hz - centre_hz) / width_hz) ** 2)))


def filtered(x, response):
    m = next_fast_len(N + SR // 2)
    return irfft(rfft(x, m) * response(np.fft.rfftfreq(m, 1 / SR)), m)[..., :N]


def wobble(rate):
    knots = rng.standard_normal(int(N * rate / SR) + 4)
    return map_coordinates(knots, [np.arange(N) * rate / SR])


def curves(rows):
    s, *cols = np.transpose(rows)
    return [np.interp(np.arange(N) / SR, s, c) for c in cols]


def along(points, hz):
    f, v = np.transpose(points)
    return np.interp(np.log(hz + 1), np.log(f + 1), v)


def unit(x):
    return x / np.sqrt(np.mean(x ** 2) + 1e-20)


def scene():
    metal = charm() + knocks() + steel() + light_contacts()
    metal = metal + notes(GLANCES, t60=0.014, rise=0.004) + notes(PINGS, t60=0.008, rise=0.0003)
    paper = ticks(PAPER_TICKS, ring_db=-18, width=1.2, t60=0.005)
    lean = gain_from_decibels(curves(SIDEWAYS)[0] * [[0.5], [-0.5]])
    reflected = gain_from_decibels(-12) * room(metal + 0.5 * paper)
    near = lean * (paper + metal + rubbing() + reflected) + thuds()
    return near + mains() + room_tone() + camera()


def roll_off(x):
    return signal.sosfilt(signal.butter(12, 11740, fs=SR, output="sos"), x)


def record(dry):
    rounded = dry / (1 + np.abs(dry / 0.6) ** 4) ** 0.25

    def band_limit(hz):
        edge_db = -36 / (1 + np.exp(np.clip((11170 - hz) / 60, -30, 30)))
        skirt_db = -3 * np.clip(hz / 1000 - 11.3, 0, 9)
        return gain_from_decibels(edge_db + skirt_db)

    return roll_off(filtered(rounded, band_limit))


dry = scene()
out = record(dry)
wav_record(out)
```